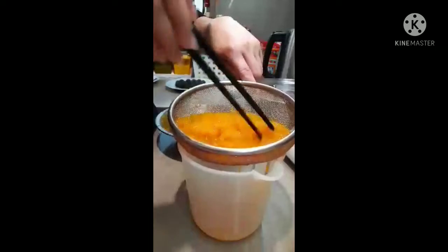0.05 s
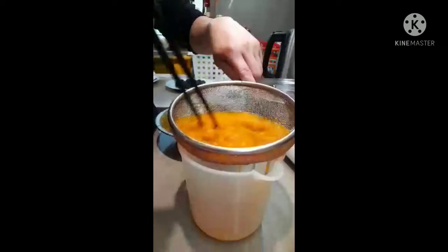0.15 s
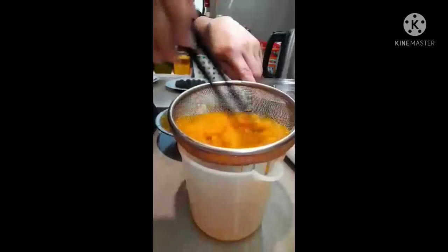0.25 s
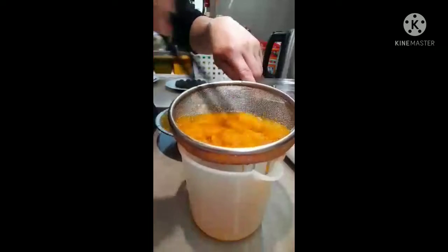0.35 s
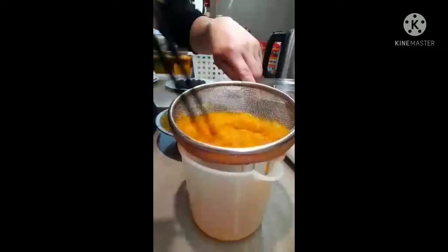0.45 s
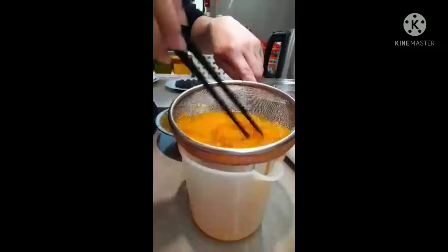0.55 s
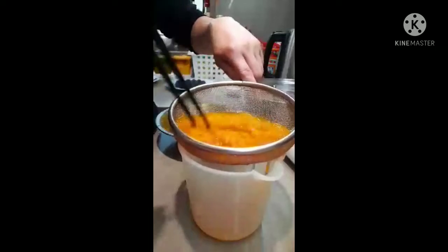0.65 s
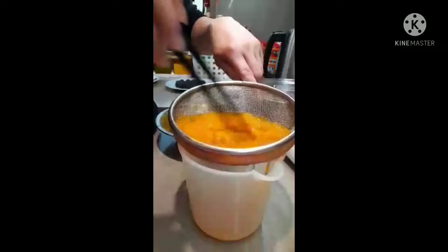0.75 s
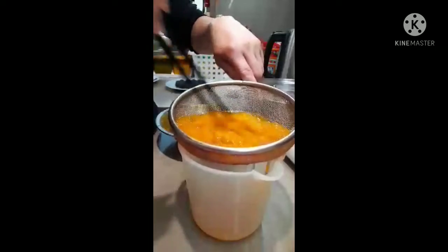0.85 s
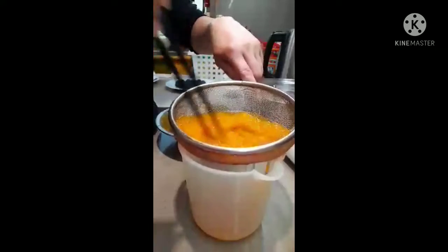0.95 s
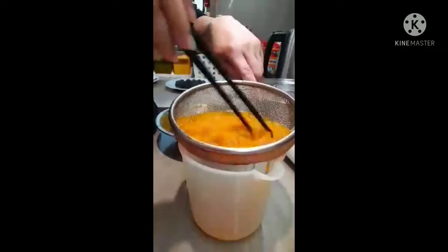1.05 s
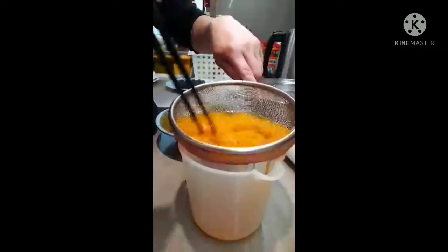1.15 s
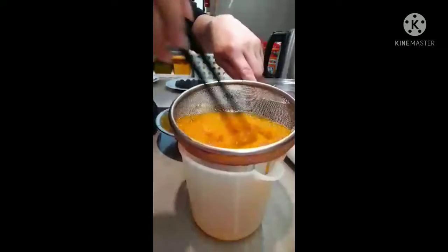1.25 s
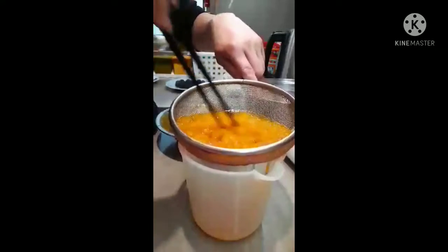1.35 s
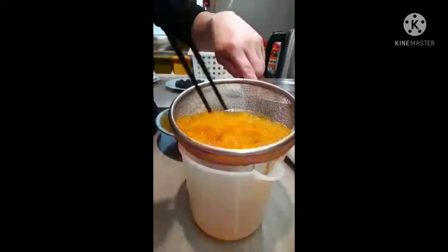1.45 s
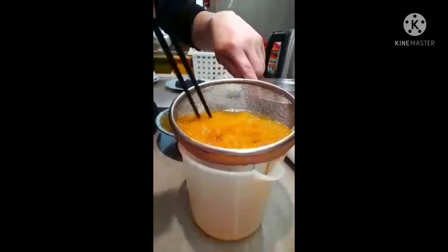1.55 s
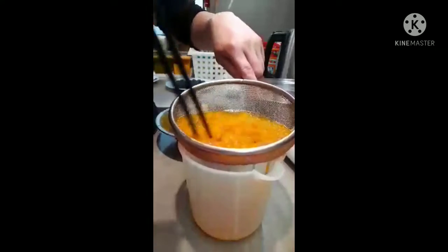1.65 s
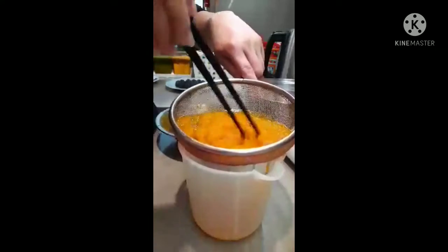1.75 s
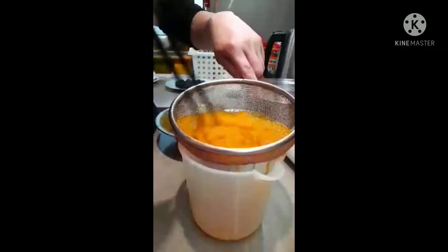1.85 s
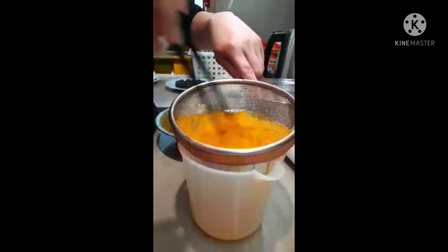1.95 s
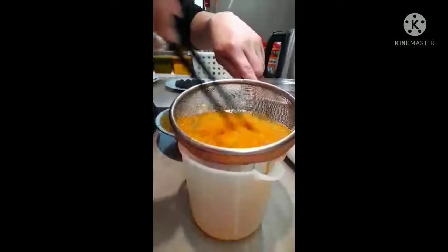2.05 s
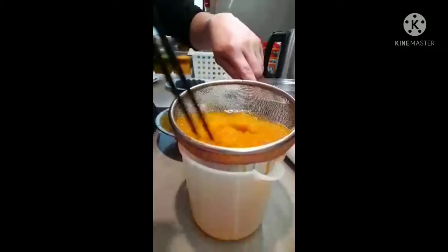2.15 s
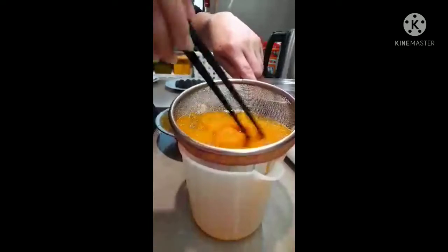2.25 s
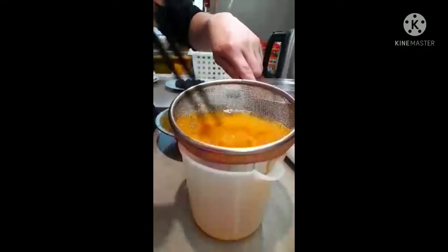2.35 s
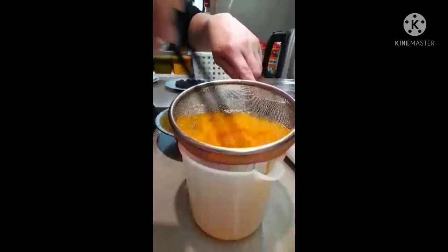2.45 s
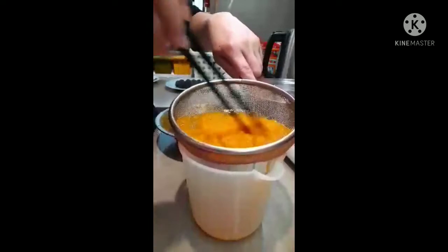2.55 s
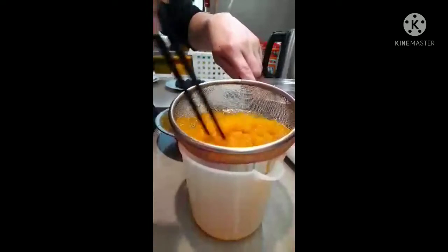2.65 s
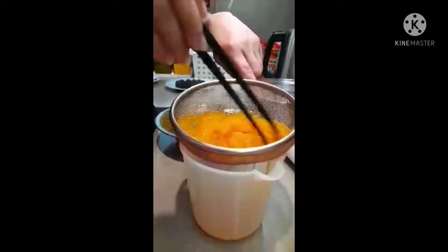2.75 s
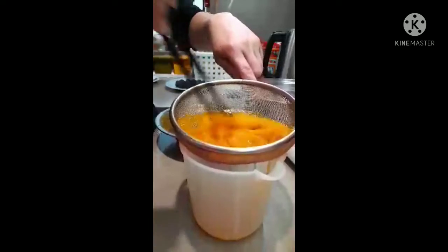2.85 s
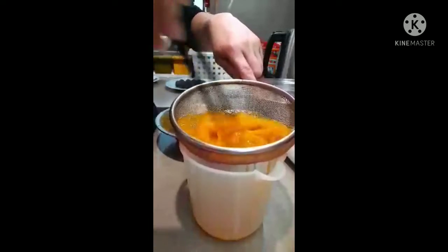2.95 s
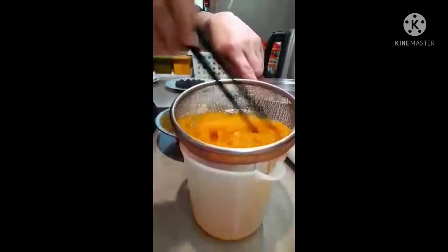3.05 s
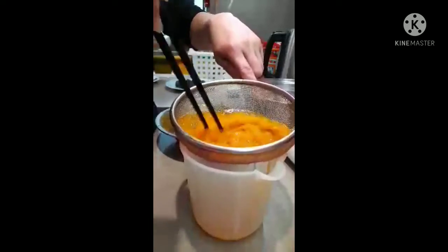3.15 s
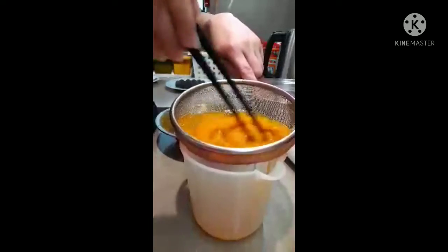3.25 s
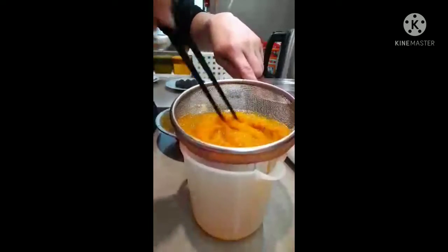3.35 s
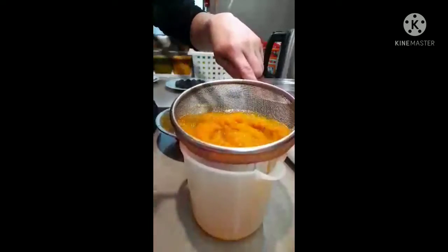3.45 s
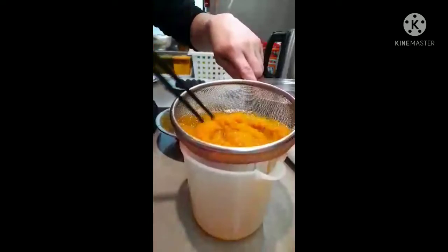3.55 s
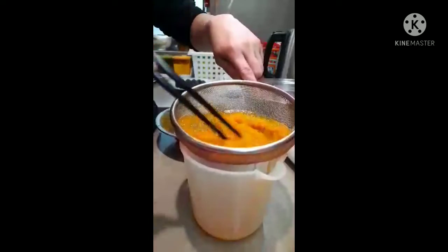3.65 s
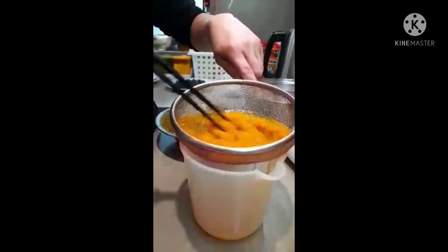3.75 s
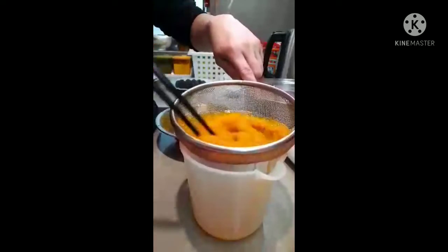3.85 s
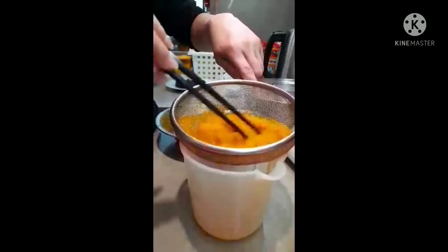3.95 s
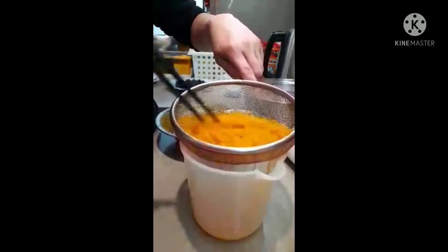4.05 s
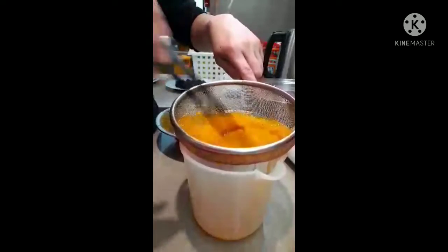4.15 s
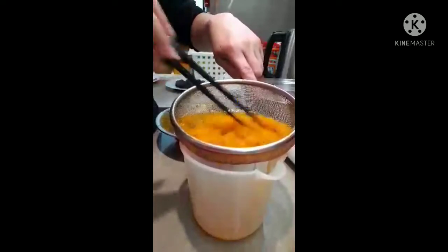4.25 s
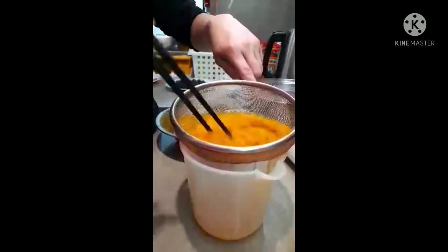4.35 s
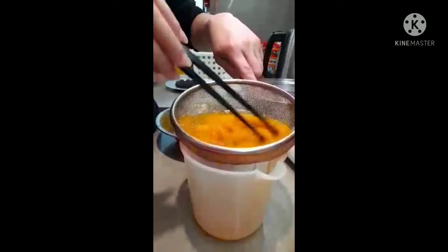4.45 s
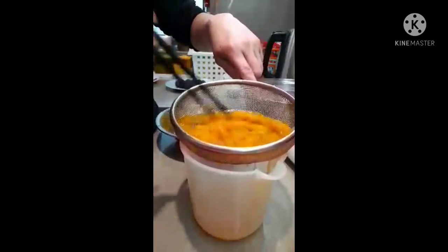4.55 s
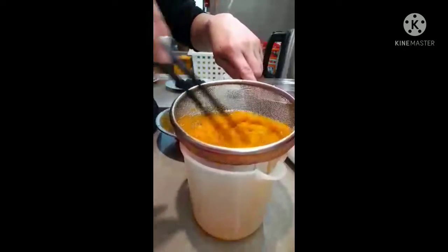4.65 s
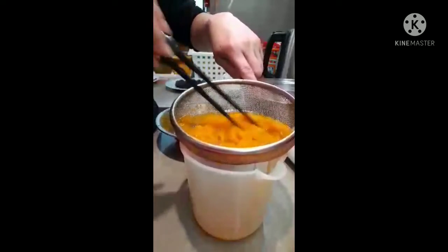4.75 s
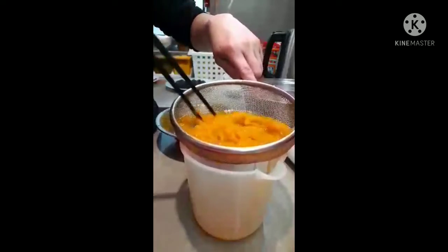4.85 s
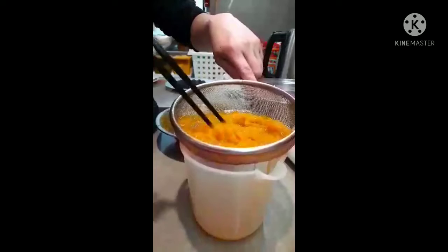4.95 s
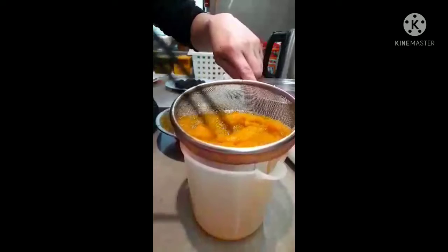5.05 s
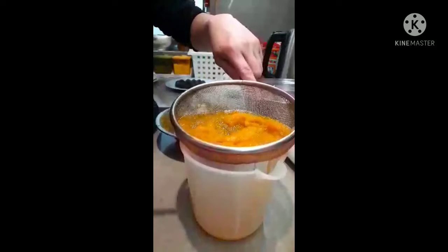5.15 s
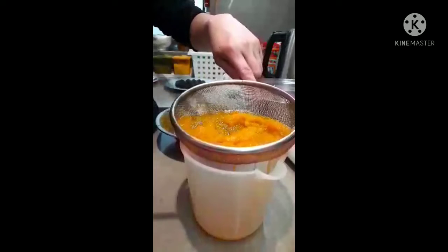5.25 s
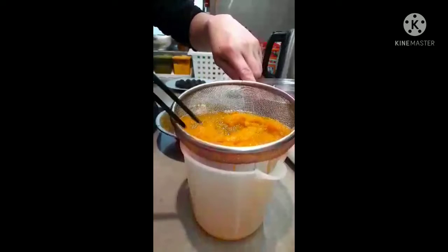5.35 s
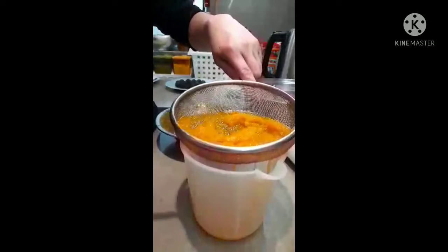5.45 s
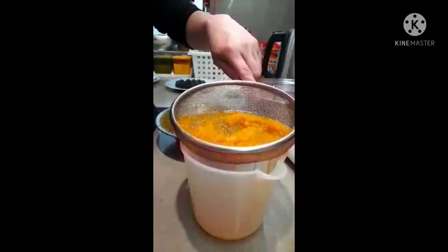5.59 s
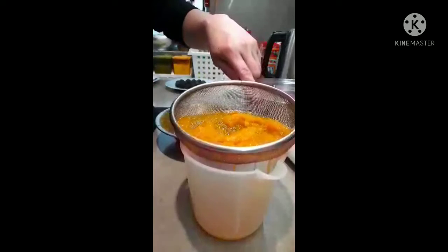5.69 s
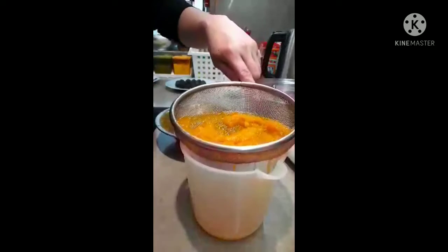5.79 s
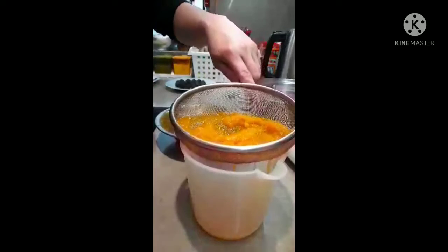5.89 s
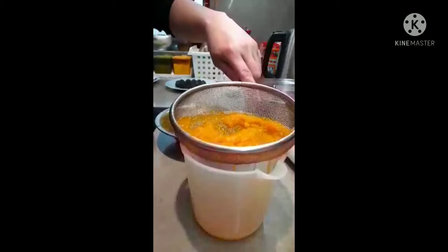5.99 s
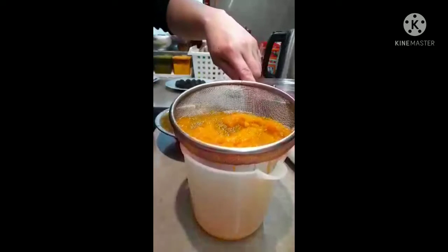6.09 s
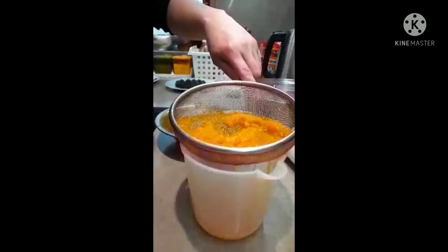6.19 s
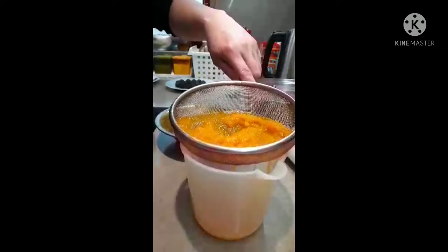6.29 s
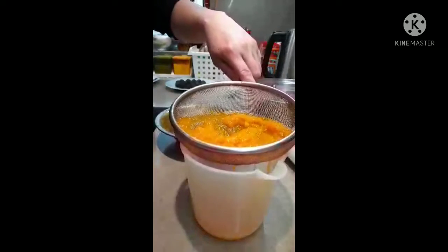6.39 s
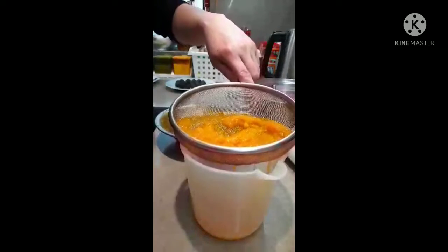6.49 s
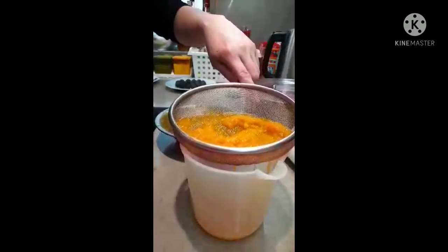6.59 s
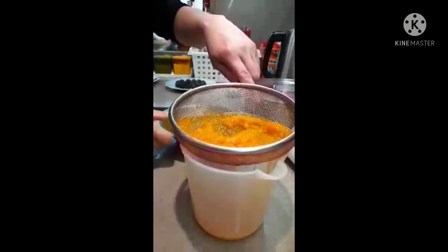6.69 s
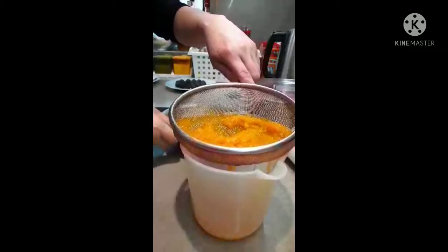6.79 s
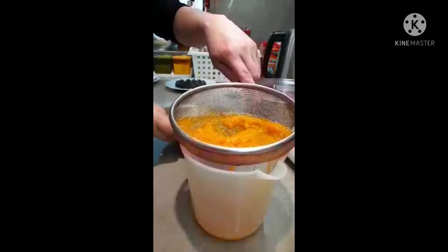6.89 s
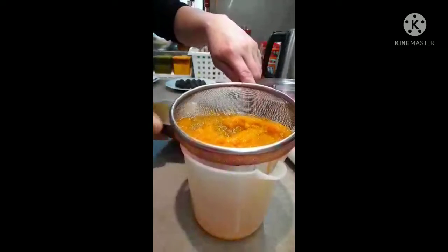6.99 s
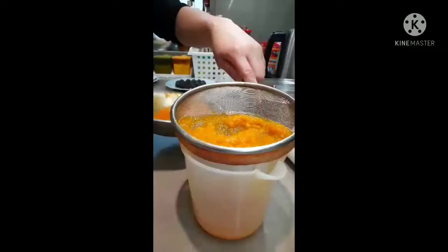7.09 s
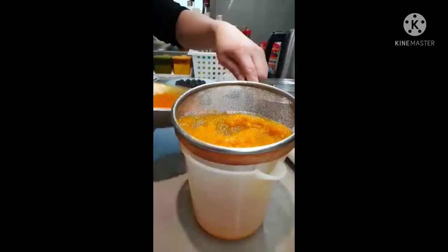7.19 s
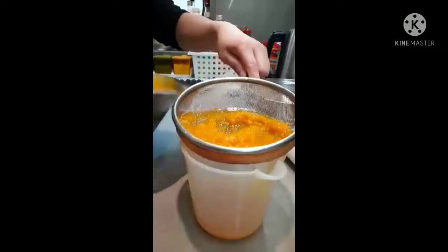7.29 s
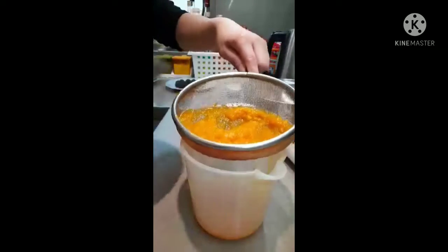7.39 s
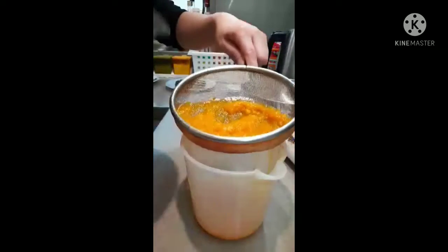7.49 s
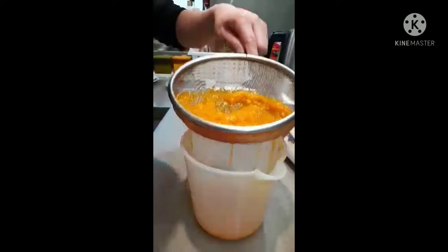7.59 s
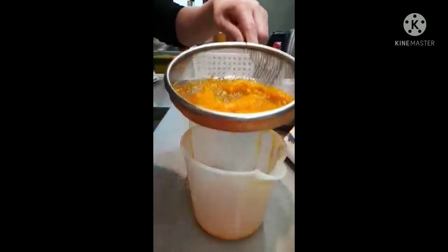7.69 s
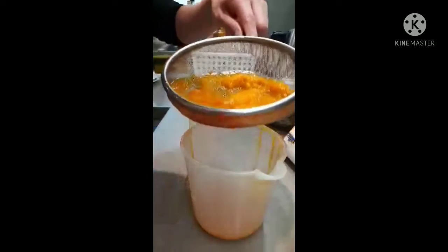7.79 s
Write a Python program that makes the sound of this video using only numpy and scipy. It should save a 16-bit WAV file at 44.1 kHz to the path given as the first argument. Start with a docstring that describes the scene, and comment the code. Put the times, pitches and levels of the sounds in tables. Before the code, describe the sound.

Quick raspy stirring in a metal sieve with hollow bumps, followed by two sharp taps and chopsticks clattering onto a table.

```python
"""Chopsticks stir squash pulp round a wire-mesh strainer on a plastic jug, over a small kitchen's low rumble.
For five seconds the tips rasp over the wires, drag through the pulp and bump the bowl, so the jug booms.
Then the sticks are tapped off on the rim. Just after six seconds they are put down to the right, where
they bounce and make the table thud. Last, a hand brushes past the strainer, with a few faint ticks."""
import sys
import numpy as np
from scipy import signal
from scipy.fft import rfft, irfft, next_fast_len
from scipy.io import wavfile
from scipy.ndimage import uniform_filter1d, minimum_filter1d, map_coordinates

SR = 44100
rng = np.random.default_rng(int(sys.argv[2]) if len(sys.argv) > 2 else 0)


def master(y):
    """Save y as 16-bit WAV."""
    cut = np.clip(np.atleast_2d(y).T, -1, 1)
    pcm = np.round(cut * 32767)  # scale
    wavfile.write(sys.argv[1], SR, pcm.astype(np.int16))


N = 345299
HZ = np.maximum(np.fft.rfftfreq(next_fast_len(N), 1 / SR), 1)
# In the tables, level_db compares rows with each other and pan_db is left minus right.
# A ring_s or fade_s is the time a sound takes to die away by 60 dB.


def from_db(db):
    """Turn decibels into a gain to multiply by."""
    return 10 ** (np.asarray(db) / 20)


def unit_power(x):
    """Scale a signal to an average power of 1."""
    return x / np.sqrt(np.mean(x ** 2) + 1e-20)


def gain_over_time(points):
    """Join (time_s, level_db) points into a gain for every sample, silent outside them."""
    times_s, levels_db = np.transpose(points)
    return from_db(np.interp(np.arange(N) / SR, times_s, levels_db, left=-120, right=-120))


def at_hz(points, hz):
    """Read between a table's rows, with octaves evenly spaced."""
    pitches_hz, values = np.transpose(points)
    return np.interp(np.log(hz), np.log(pitches_hz), values)


def colour(x, gain_db):
    """Shape a noise with a gain for every frequency."""
    size = next_fast_len(N)
    return irfft(rfft(x, size) * from_db(gain_db), size)[..., :N]


def drift(rate_hz):
    """A smooth random wander, about 1 in size."""
    step = 40
    pole = np.exp(-2 * np.pi * rate_hz * step / SR)
    slow = signal.lfilter([1], [1, -2 * pole, pole * pole], rng.standard_normal(N // step + 1002))[1000:]
    return np.interp(np.arange(N) / step, np.arange(len(slow)), unit_power(slow))


def ring(pushes, hz, ring_s):
    """Each push starts a tone that dies away."""
    decay, angle = from_db(-60 / (ring_s * SR)), 2 * np.pi * hz / SR
    return signal.lfilter([0, np.sin(angle)], [1, -2 * decay * np.cos(angle), decay ** 2], pushes + 1e-18)


def resonate(x, hz, width_hz):
    """Let through one band of pitches, at full strength in its middle."""
    decay, angle = np.exp(-np.pi * width_hz / SR), 2 * np.pi * hz / SR
    feedback = [1, -2 * decay * np.cos(angle), decay ** 2]
    return signal.lfilter(np.array([1, 0, -1]) * (1 - decay ** 2) / 2, feedback, x)


def place(x, pan_db, right_lag_s=0.00013):
    """Put a sound left or right; it reaches the right channel a little late."""
    late = np.interp(np.arange(N) - right_lag_s * SR, np.arange(N), x)
    return np.array([x * from_db(pan_db / 2), late * from_db(-pan_db / 2)])


def room_rumble():
    """Broad room noise, narrow bands of rumble and a wavering mains hum, under the microphone's gain."""
    # The tone of the broad noise: pitch_hz, level_db
    room_tone = [(35, -13), (60, 4), (75, -7), (97, -5), (178, -16.5), (208, -21), (299, -1), (328, -9),
                 (723, -12), (792, -15), (867, -15), (3770, -33), (4130, -38), (13400, -34.5)]
    # How alike left and right are: pitch_hz, likeness (0 to 1)
    likeness = [(60, 0.94), (230, 0.64), (880, 0.01), (3380, 0.01), (13000, 0.011)]
    # The narrow bands: pitch_hz, width_hz, level_db
    rumble_bands = [(74.8, 16, -29), (103.5, 31, -13.5), (145.7, 18.5, -16), (174.8, 4.9, -16),
                    (297.7, 7.1, -16.5), (374.7, 62, -14)]
    # Gain control as a set curve, ducking the background after loud knocks: time_s, level_db
    mic_gain = [(0.0, -37), (1.66, -38), (2.77, -38.5), (3.09, -43.5), (3.68, -42.5), (3.99, -41.5),
                (4.75, -36.5), (5.69, -40.5), (6.1, -38), (6.69, -45), (7.46, -44.5), (7.83, -41)]
    common, opposite = rng.standard_normal((2, N))
    alike = at_hz(likeness, HZ)
    common = colour(common, at_hz(room_tone, HZ) + 10 * np.log10(1 + alike))
    opposite = colour(opposite, at_hz(room_tone, HZ) + 10 * np.log10(1 - alike))
    broad = unit_power(common + opposite * [[1], [-1]])
    shake = rng.standard_normal(N)
    narrow = sum(from_db(level_db) * unit_power(resonate(resonate(shake, hz, width_hz), hz, width_hz))
                 for hz, width_hz, level_db in rumble_bands)
    hum_hz = 48.6 + 2.86 * drift(5.4)
    hum = from_db(-7 + 0.5 * drift(6.8)) * np.sin(2 * np.pi * np.cumsum(hum_hz) / SR)
    return gain_over_time(mic_gain) * (from_db(-5) * broad + narrow + hum) * from_db([[-1.8], [1.8]])


def sweeps(dig_in_s=0.063, ease_off_s=0.043, turn_s=0.1, turn_db=-10.5):
    """Each sweep digs in, swells or fades, then eases off; gives the gains for rasp, drag and boom."""
    # Sweeps of the tips across the mesh: start_s, length_s, swell_db, rasp_db, drag_db, boom_db
    strokes = [(0, 0.21, -1, -37, -37.5, -34), (0.153, 0.069, -1, -35, -54, -30.5),
               (0.247, 0.12, 11.5, -38.5, -40.5, -34), (0.397, 0.1, -22, -32.5, -36.5, -31),
               (0.488, 0.13, 8, -39.5, -40, -34.5), (0.618, 0.2, -9.5, -38.5, -41.5, -35.5),
               (0.781, 0.089, 1.5, -36, -36.5, -32), (0.862, 0.19, -7, -39.5, -44.5, -38),
               (1.016, 0.096, 8, -36.5, -38.5, -33), (1.11, 0.17, -11, -38, -41.5, -34),
               (1.278, 0.091, 5, -35.5, -37.5, -29), (1.377, 0.043, -0.5, -31, -39, -27.5),
               (1.668, 0.1, -26, -38.5, -40, -33), (1.762, 0.25, -11, -39.5, -43, -32),
               (1.968, 0.11, 12.5, -41.5, -42, -39), (2.097, 0.11, -12, -34, -41.5, -29.5),
               (2.194, 0.15, 5, -39, -40, -33.5), (2.348, 0.12, -4, -37, -43, -33),
               (2.455, 0.16, 6.5, -40, -40, -33), (2.611, 0.19, -9, -40, -48.5, -30),
               (2.743, 0.078, 10, -38, -40, -28), (2.885, 0.12, -16, -40, -51.5, -29.5),
               (2.994, 0.11, 3, -42.5, -42.5, -29.5), (3.131, 0.099, -17, -38, -42.5, -26),
               (3.199, 0.21, 5, -45.5, -48, -33), (3.596, 0.14, 5, -46, -47.5, -34),
               (3.804, 0.15, 1.5, -45.5, -48.5, -41), (3.954, 0.19, -3.5, -39.5, -45, -36.5),
               (4.174, 0.21, 0.5, -39.5, -44, -32), (4.424, 0.19, 9, -37.5, -38.5, -36),
               (4.657, 0.2, 10, -38, -42, -33.5), (5.002, 0.086, -7.5, -37.5, -39.5, -33)]
    power, t = np.zeros((3, N)), np.arange(round(0.5 * SR)) / SR
    for start_s, length_s, swell_db, *levels_db in strokes:
        shape = np.clip(t / dig_in_s, 0, 1) * np.clip(1 - (t - length_s) / ease_off_s, 0, 1)
        shape *= from_db(swell_db * (t / length_s - 0.5))
        power[:, round(start_s * SR):][:, :len(t)] += np.outer(from_db(levels_db), shape) ** 2
    # In short turns between sweeps the tips keep rubbing lightly.
    width = round(turn_s * SR)
    gaps_filled = minimum_filter1d(-minimum_filter1d(-power, size=width), size=width)
    return np.sqrt(power + from_db(2 * turn_db) * gaps_filled)


def wire_slips(shared, slips_per_s=5000):
    """The tips skip from wire to wire: dense uneven ticks, partly shared by left and right."""
    sizes = from_db(2.5 * np.minimum(rng.exponential(1, (3, N)), 5)) * rng.choice([-1, 1], (3, N))
    ticks = sizes * (rng.random((3, N)) < slips_per_s / SR)
    return np.sqrt(shared) * place(ticks[0], 0) + np.sqrt(1 - shared) * ticks[1:]


def bright_bands(x, wander_db=4.5, waver_share=0.025):
    """Broad treble peaks colour the rasp, wavering slightly in strength and pitch."""
    # The treble peaks: pitch_hz, width_hz, boost_db
    bands = [(2765, 140, 9), (4050, 200, 13), (5410, 570, 7.5), (7400, 340, 6), (9100, 990, 6.5),
             (11590, 810, 19)]
    narrowest_hz = 450   # broad bands make the rasp hiss rather than whistle
    for hz, width_hz, boost_db in bands:
        boost = from_db(boost_db + wander_db * drift(8.9))
        x = x + (boost - 1) * resonate(x, hz, max(width_hz, narrowest_hz))
    read_at = np.cumsum(1 + waver_share * drift(5))   # reading faster raises the pitch
    return np.array([map_coordinates(side, [read_at], order=2, mode="mirror") for side in x])


def scattered_rings(gain, tone, per_s, low_hz, high_hz, cycles):
    """Short rings at random moments and scattered pitches, as loud as the sweep's gain."""
    sizes = from_db(3.5 * np.minimum(rng.exponential(1, N), 3)) * (rng.random(N) < per_s / SR)
    pitches = np.geomspace(low_hz, high_hz, 45) * from_db(rng.normal(0, 0.15, 45))
    chosen = rng.integers(0, 45, N)
    strengths = from_db(at_hz(tone, pitches)) * np.sqrt(pitches)
    power = np.mean(sizes ** 2) * np.mean(strengths ** 2 * cycles / pitches) * SR / (4 * np.log(1000))
    rings = sum(ring(strength * sizes * gain * (chosen == k), hz, cycles / hz)
                for k, (hz, strength) in enumerate(zip(pitches, strengths)))
    return rings / np.sqrt(power)


def mesh_rasp(gain, uneven):
    """The tips rub the mesh and pluck single wires; later a passing hand rustles it softly."""
    # The tone of the rasp: pitch_hz, level_db
    rasp_tone = [(700, -57), (1500, 1), (2200, 3.5), (3300, -6.5), (6000, -1), (10000, -4), (13000, -6.5)]
    # The hand brushing past: time_s, level_db
    hand_brush = [(6.75, -83), (6.844, -60.5), (7.0, -61.5), (7.1, -80)]
    hiss = bright_bands(colour(wire_slips(shared=0.11), at_hz(rasp_tone, HZ)))
    hiss /= np.sqrt(uniform_filter1d(np.mean(hiss ** 2, axis=0), size=1500))   # even out the loudness
    rubbing = (gain * uneven + gain_over_time(hand_brush)) * hiss
    plucks = scattered_rings(gain, rasp_tone, per_s=700, low_hz=3700, high_hz=12700, cycles=260)
    return from_db(3.5) * rubbing + from_db(-5) * place(plucks, 0)


def pulp_drag(gain, uneven):
    """The tips drag dully through the pulp, where small pockets open and close."""
    # The tone of the drag: pitch_hz, level_db
    drag_tone = [(360, -17.5), (620, -3.5), (886, -11.5), (1100, -8), (1390, -8), (1550, -4.5),
                 (1790, -14.5), (2400, -14.5), (3120, -16), (5280, -120)]
    dull = unit_power(colour(wire_slips(shared=0.33), at_hz(drag_tone, HZ)))
    pockets = scattered_rings(gain, drag_tone, per_s=350, low_hz=636.4, high_hz=2570, cycles=65)
    return (gain * uneven * dull + from_db(-0.5) * place(pockets, 0)) * from_db([[-1.2], [1.2]])


def jug(pushes, damping):
    """The jug and its air ring at the same pitches for every push; more damping cuts the ring shorter."""
    # The jug's own tones: pitch_hz, level_db, ring_s (before damping)
    jug_tones = [(360, -17, 0.43), (429.5, -17, 0.19), (477.3, 4.5, 0.16), (515.5, -10.5, 0.19),
                 (547, -44, 0.06), (674, -46, 0.082), (765, -38, 0.049), (988, -40, 0.017),
                 (1190, -43, .05), (1660, -38, 0.049)]
    return sum(ring(pushes * from_db(level_db), hz, ring_s / damping) for hz, level_db, ring_s in jug_tones)


def jug_boom(gain):
    """The stirred mesh judders in lumps and keeps the jug booming."""
    jolts = rng.standard_normal(N) * from_db(6 * drift(22))
    boom = jug(jolts * gain, damping=1.4) / np.std(jug(jolts, damping=1.4))
    return place(boom, -2.4)


def stirring():
    """The rasp of the wires, the drag in the pulp and the boom of the jug all follow the sweeps."""
    rasp_gain, drag_gain, boom_gain = sweeps()
    uneven = from_db(1.8 * drift(25))
    return mesh_rasp(rasp_gain, uneven) + pulp_drag(drag_gain, uneven) + jug_boom(boom_gain)


def bowl_bumps(rock_hz=460, slow_rock_hz=290, scuff_fade_s=0.064):
    """A padded push rocks the bowl and scuffs the mesh; its hard edge wakes the jug's higher tones."""
    # The tips bump the bowl: middle_s, level_db, slow_rock_db, length_s
    bumps = [(0.14, -13, 1.5, 0.011), (0.175, -22.5, -6, 0.012), (0.378, -29.5, 16, 0.0092),
             (0.411, -36.5, 23, 0.01), (0.547, -31, -2, .015), (0.837, -31, -3, .015),
             (1.037, -25.5, -9, 0.016), (1.164, -20.5, -5, 0.0087), (1.379, -28.5, 2, .015),
             (1.633, -32.5, -2, 0.011), (1.685, -22, 5, 0.011), (1.751, -18, -8, 0.025),
             (1.848, -19, -10, .02), (2.056, -26, 2, 0.0074), (2.173, -22.5, -9, .015),
             (2.35, -22.5, -5, 0.029), (2.45, -21, -17, 0.028), (2.561, -20, -22, .015),
             (2.609, -20.5, -2, .012), (2.799, -16, -20, 0.015), (2.85, -1, -3, 0.015),
             (3.112, -10.5, -2, 0.016), (3.688, -20.5, -22, 0.0205), (4.03, -20.5, -15, 0.04),
             (4.304, -11, -7.5, 0.012), (4.514, -20, -26, .022), (4.549, -14, 0, 0.0096),
             (4.612, -23.5, 7, .015), (4.771, -27.5, -10, .02), (4.797, -25, 1, .015),
             (4.831, -26.5, -6, 0.0092), (4.885, -37, -14, 0.028), (5.013, -21.5, -7, 0.0082)]
    force, scuff_gain = np.zeros((2, N))
    fade = from_db(-60 * np.arange(2000) / SR / scuff_fade_s)
    for middle_s, level_db, slow_rock_db, length_s in bumps:
        middle, size = round(middle_s * SR), round(length_s * SR)
        phase = 2 * np.pi * np.arange(size) / SR
        rocking = np.sin(rock_hz * phase) + from_db(slow_rock_db) * np.sin(slow_rock_hz * phase)
        force[middle - size // 2:][:size] += from_db(level_db) * np.hanning(size) * rocking * 4 / size
        force[middle] += from_db(-45 + 0.32 * level_db)   # the edge grows more slowly than the push
        scuff_gain[middle - size // 4:][:len(fade)] += from_db(-9.5 + 0.75 * level_db) * fade
    bass_cut = signal.butter(3, 253, "high", fs=SR, output="sos")   # the bumps give out little bass below 250 Hz
    boom = jug(signal.sosfilt(bass_cut, force + 1e-18), damping=2)   # the tips stay on and damp the bowl
    scuff_band = signal.butter(2, (590, 2280), "band", fs=SR, output="sos")
    scuff = signal.sosfilt(scuff_band, (scuff_gain + 1e-9) * rng.standard_normal(N))
    return place(boom + scuff, -2.2)


def rattles(hits, ring_db, detune_share, crack_s=0.0049, rise_s=0.00094):
    """Each hit is a dry crack and a short rattle, coloured by bright tones that vary from hit to hit."""
    # Short bright tones that colour each click: pitch_hz, level_db, ring_s
    click_tones = [(2260, -10, .015), (2840, -13, .012), (3950, -9, .015), (4260, -8, .02), (5400, -5, .05),
                   (5850, -8, .04), (7050, -5, .02), (7500, -3, .025), (8050, -11, .014), (9200, 0, .018),
                   (9700, -2, .018), (10500, -10, .012), (11400, 3, .022), (12000, -3, .012)]
    tone_hz, tone_db, ring_s = np.transpose(click_tones)[:, :, None]
    out, t = np.zeros((2, N)), np.arange(5000) / SR
    hz = np.maximum(np.fft.rfftfreq(len(t), 1 / SR), 1)
    bass_cut = 1 / (1 + (800 / hz) ** 4)
    for start_s, level_db, pan_db, fade_s, brightness in hits:
        detune = 1 + detune_share * rng.standard_normal((len(click_tones), 1))
        strengths = from_db(ring_db + 3 * rng.standard_normal((2, len(click_tones))))
        ringing = strengths @ (from_db(tone_db - 60 * t / ring_s) * np.sin(2 * np.pi * tone_hz * detune * t))
        noise = 0.075 * rng.standard_normal(len(t)) + 0.93 * rng.standard_normal((2, len(t)))
        shape = (from_db(-60 * t / fade_s) + 1.7 * from_db(-60 * t / crack_s)) * np.minimum(t / rise_s, 1)
        tilt = from_db(brightness * np.log2(np.maximum(hz, 1800) / 9000))
        rattle = irfft(rfft(noise * shape) * tilt * bass_cut * (1 + rfft(ringing)))
        side_gains = from_db(level_db - 19.5 + pan_db * np.array([[0.5], [-0.5]]))
        out[:, round(start_s * SR):][:, :len(t)] += rattle * side_gains
    return out


def taps_and_clicks():
    """Light clicks and sharp taps of the sticks, with a few faint ticks at the end."""
    # Clicks, taps and ticks: start_s, level_db, pan_db, fade_s, brightness_db_per_octave
    clicks = [(1.6322, -28.5, 4, 0.034, -3.5), (1.686, -21, -1.5, 0.088, 0.5), (3.6007, -35, 0, 0.036, -6),
              (5.0132, -23, 1, 0.15, -5), (5.2735, -24, 14, 0.016, 1), (5.2767, 0.5, 3.5, 0.049, 4),
              (5.2834, 1, -3, 0.038, 3), (5.449, 2.5, 1, 0.021, 6.5), (5.4547, -2, -2, 0.051, 6),
              (6.9905, -25, 4, 0.021, -5), (7.0115, -35, -8, 0.017, -6), (7.0444, -41, 18, 0.039, -5)]
    return rattles(clicks, ring_db=-24, detune_share=0.04)


def small_clinks(pair_gap_hz=34):
    """A brief soft contact rings a tone and a weaker, longer one just below it; the two beat together."""
    # Small pocks and clinks: start_s, level_db, pitch_hz, ring_s, pan_db
    clinks = [(2.906, -13, 980, 0.0088, -2), (2.912, -23.5, 1350, 0.012, -2), (4.346, -27, 1330, 0.042, -2),
              (4.596, -18.5, 678, 0.09, -5), (5.032, -25, 1237, 0.067, -5), (5.278, -31.5, 600, 0.051, -3),
              (5.449, -27, 560, 0.028, 0), (6.124, -31.5, 1050, 0.053, 2), (6.133, -38, 5360, 0.26, -8),
              (6.309, -23.5, 7460, 0.042, 1), (6.338, -40, 5870, 0.19, -5), (7.01, -29, 3170, 0.015, -8),
              (7.193, -41.5, 2230, 0.093, -3)]
    out, t = np.zeros((2, N)), np.arange(200) / SR
    for start_s, level_db, hz, ring_s, pan_db in clinks:
        push = from_db(level_db - 36) * np.hanning(len(t)) * np.sin(2 * np.pi * hz * t)
        contact = np.zeros(N)
        contact[round(start_s * SR):][:len(t)] = push
        partner = from_db(-10.5) * ring(contact, hz - pair_gap_hz, 2 * ring_s)
        out += place(ring(contact, hz, ring_s) + partner, pan_db)
    return out


def sticks_landing():
    """The loose sticks land on the table to the right and bounce with a bright clatter."""
    # Landings and bounces: start_s, level_db, pan_db, fade_s, brightness_db_per_octave
    bounces = [(6.1247, 3, -14, 0.008, 4.5), (6.130, -12, -15, 0.067, 5), (6.143, -23, -7, 0.12, -4),
               (6.263, -11, -16, 0.03, 8), (6.2665, -13, -10.5, 0.17, 6), (6.2875, -9.5, -6, 0.1, 4),
               (6.306, -12, -15, 0.046, 8), (6.3105, -12.5, -5, 0.04, -0.5), (6.3405, -23.5, -14, 0.04, 16),
               (6.347, -16, -19, 0.023, 16)]
    return rattles(bounces, ring_db=-17, detune_share=0.008)


def table_thuds():
    """The landing sticks give the table soft pushes of a few milliseconds."""
    # The table's thuds: start_s, level_db, pitch_hz
    thuds = [(6.126, -37, 90), (6.265, -30.5, 62), (6.31, -32.5, 70.4)]
    out, push = np.zeros(N), np.hanning(200) / 100
    for start_s, level_db, hz in thuds:
        contact = np.zeros(N)
        contact[round(start_s * SR):][:len(push)] = from_db(level_db) * push
        out += ring(contact, hz, ring_s=0.021)
    return place(out, -41)


def kitchen_echo(x):
    """Sound bounces round the kitchen: eight repeating echoes a side, dying fastest in the bass."""
    # How long the echo lasts: pitch_hz, fade_s
    echo_times = [(200, 0.081), (2000, 0.39), (12000, 0.33)]
    size = next_fast_len(N + SR)
    hz = np.maximum(np.fft.rfftfreq(size, 1 / SR), 1)
    fade_s, tails = at_hz(echo_times, hz), np.zeros((2, len(hz)), complex)
    for k, delay_s in enumerate(rng.uniform(0.0088, 0.043, size=16)):
        round_trip = np.exp(-delay_s * (np.log(1000) / fade_s + 2j * np.pi * hz))
        tails[k % 2] += round_trip / (1 - round_trip) * (-1) ** (k // 2)
    return irfft(rfft(x.mean(axis=0), size) * tails, size)[:, :N]


def scene():
    """The work at the strainer and its echo, over the room's rumble."""
    soft = stirring() + bowl_bumps() + small_clinks() + table_thuds()
    sharp = taps_and_clicks() + sticks_landing()
    return soft + sharp + kitchen_echo(from_db(-15.5) * soft + from_db(-13) * sharp) + room_rumble()


def record(dry):
    """The microphone adds faint hiss, drops the deepest bass, rounds the peaks and cuts the top treble."""
    hiss = from_db(-67) * np.diff(rng.standard_normal((2, N + 1)))
    thinned = signal.sosfilt(signal.butter(3, 42, "high", fs=SR, output="sos"), dry + hiss)
    rounded = thinned / (1 + (thinned / 0.95) ** 6) ** (1 / 6)
    return signal.sosfilt(signal.ellip(12, 0.5, 70, 13250, fs=SR, output="sos"), rounded)


dry = scene()
out = record(dry)
master(out)
```